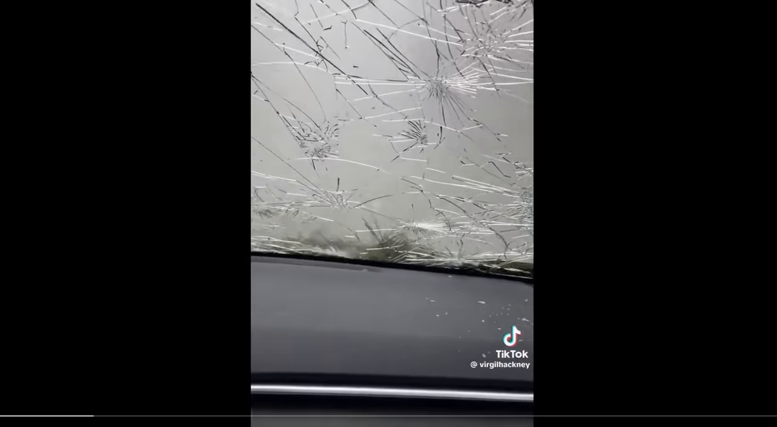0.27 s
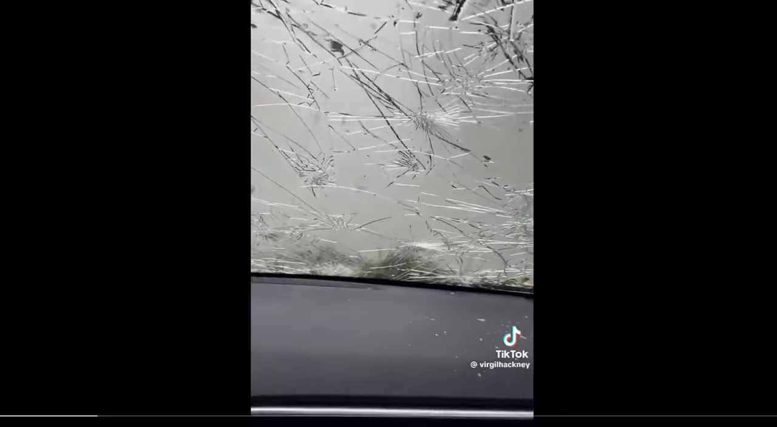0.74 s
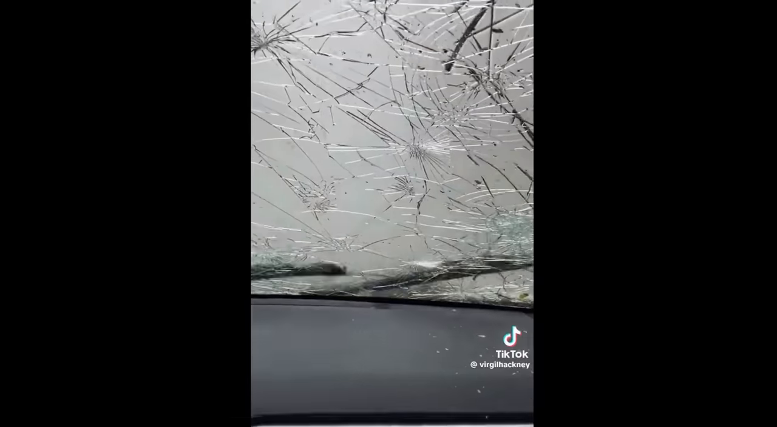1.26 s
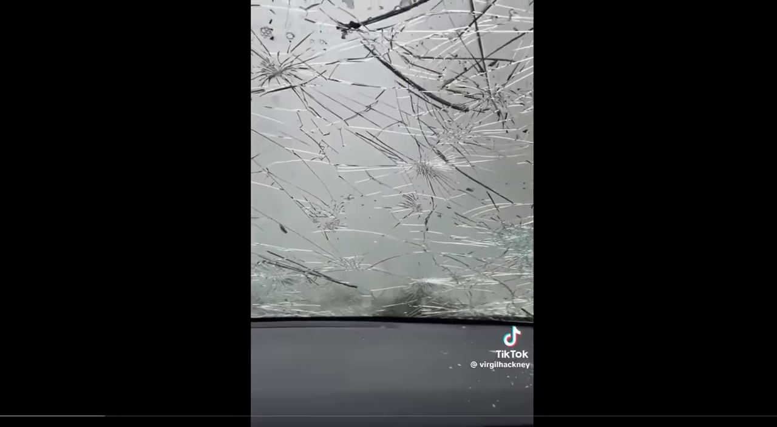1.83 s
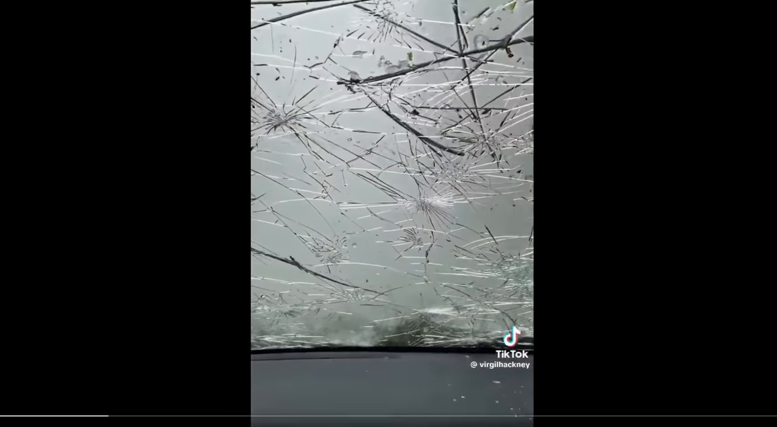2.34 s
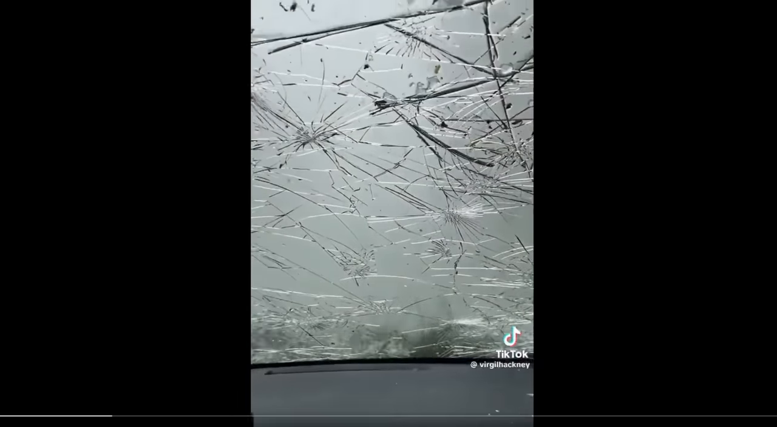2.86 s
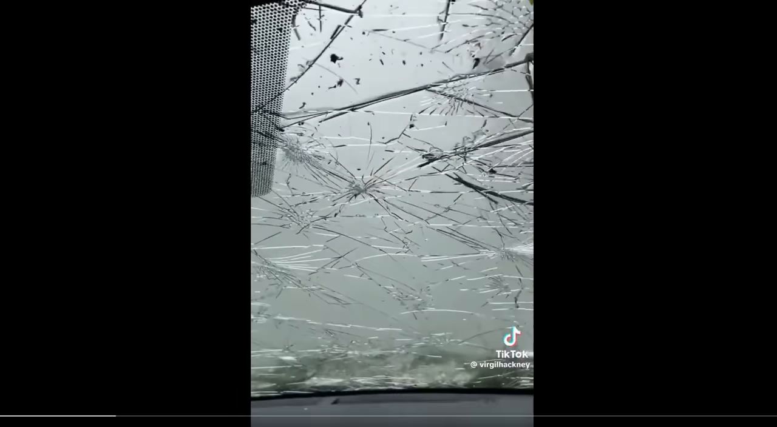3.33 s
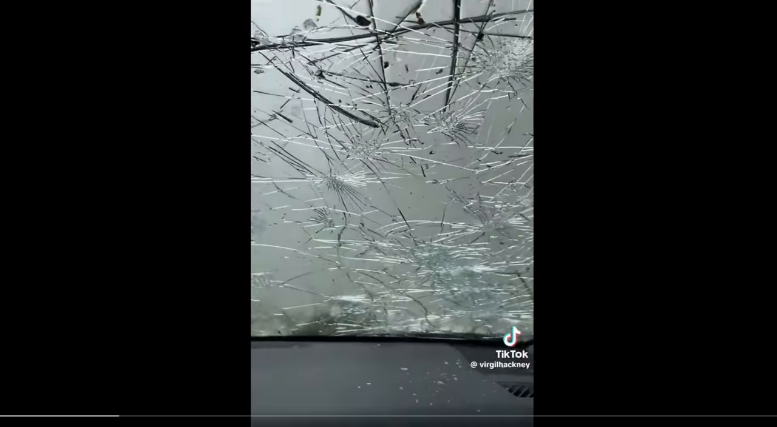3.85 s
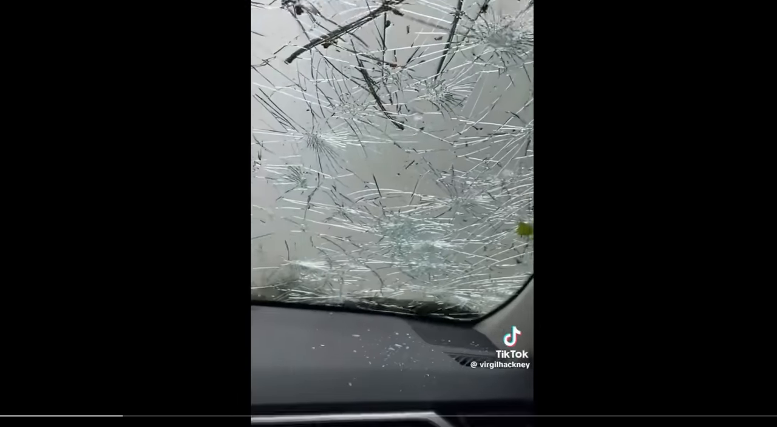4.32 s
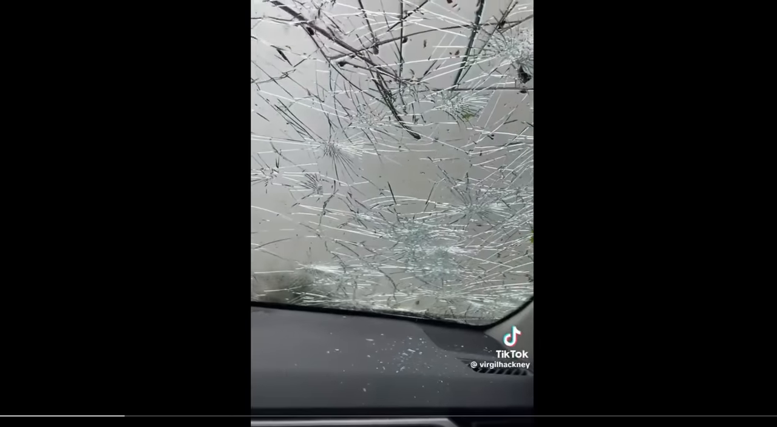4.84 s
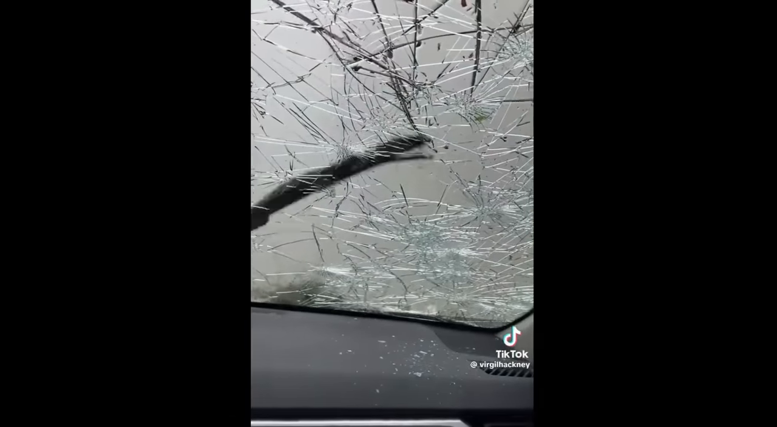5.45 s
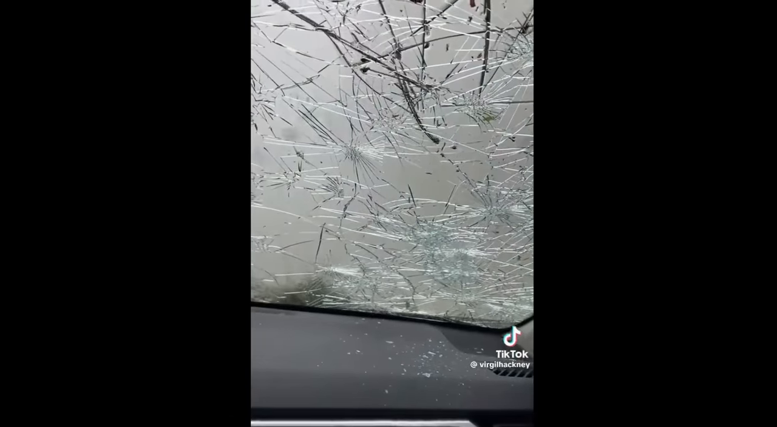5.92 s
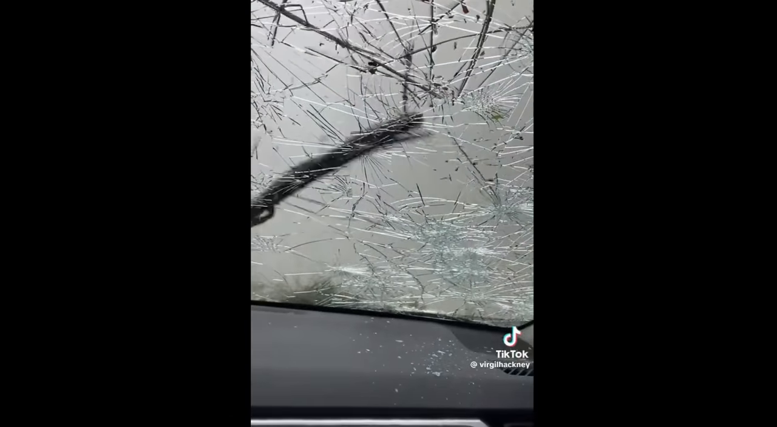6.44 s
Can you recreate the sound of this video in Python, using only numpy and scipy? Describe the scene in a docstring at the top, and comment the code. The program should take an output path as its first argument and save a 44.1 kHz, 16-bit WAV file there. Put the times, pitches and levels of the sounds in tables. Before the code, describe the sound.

Inside a closed car in a hailstorm, big stones strike roof and windscreen about twenty times a second, unevenly. Loud hollow knocks with sharp cracks mix with dull thuds and light ticks. Each blow dies quickly with a short boxy panel ring. Rain and tiny pellets patter quietly underneath. A close stereo microphone in the cabin catches centred bass and wider, scattered treble.

```python
"""Hail on a car, from inside

Hailstones pelt the roof and windscreen, from loud knocks to faint ticks; a two-port microphone hears
them in the cabin. Each blow sends a bending wave through the panel: treble first, bass last, a falling
sweep; the scattered ring of panels and cabin follows, with a short note of the panel and of the clack.
Underneath, rain and small stones make a patchy noise wash, and small hard pellets tick."""
import sys
import numpy as np
from scipy import signal
from scipy.fft import rfft, irfft
from scipy.io import wavfile
from scipy.ndimage import uniform_filter1d, minimum_filter1d

SR = 44100
rng = np.random.default_rng(int(sys.argv[2]) if len(sys.argv) > 2 else 0)


def to_wav(s):
    """Save 16-bit WAV."""
    ch = np.atleast_2d(s).T  # columns
    pcm = np.round(np.clip(ch, -1, 1) * 32767)  # PCM
    wavfile.write(sys.argv[1], SR, pcm.astype(np.int16))


N = 295012
SIZE = 8192  # samples in one blow


def gain_of(db):
    """Decibels to gain."""
    return np.exp(np.asarray(db) * (np.log(10) / 20))


def evened(x):
    """Scales each row to rms 1."""
    return x / np.sqrt(np.mean(abs(x) ** 2, axis=-1, keepdims=True) + 1e-20)


def read(points, hz):
    """Reads a spectrum table on a log frequency axis."""
    f, value = np.transpose(points)
    return np.interp(np.log(hz + 1), np.log(f + 1), value)


def hump(offset, width):
    """A resonance curve: 1 at its centre, half as much half a width away."""
    return 1 / (1 + (2 * offset / width) ** 2)


def add(mix, s, sound):
    """Adds a sound at time s."""
    part = mix[:, round(s * SR):][:, :sound.shape[1]]
    part += sound[:, :part.shape[1]]


def causal(gain):
    """The spectrum of least delay with this magnitude, so that nothing sounds before the blow."""
    folded = irfft(np.log(gain + 1e-5 * gain.max()), SIZE)
    folded[1:SIZE // 2] *= 2
    folded[SIZE // 2 + 1:] = 0
    return np.exp(rfft(folded))


# resonances of cabin air, roof and glass: [f/Hz, width/Hz, level/dB]
CABIN_RESONANCES = [(53.6, 26.3, 12), (79.7, 17, 7), (120.5, 28, 7), (157, 81, 6), (276.6, 36, 3.5),
                    (779, 19, 5.5), (961, 260, 5), (2320, 84, 2), (5270, 210, -3)]


def cabin_db(hz):
    """Resonances of air, roof and glass raise or lower the spectrum around their frequencies."""
    return sum(db * hump(hz - f, width) for f, width, db in CABIN_RESONANCES)


# relative colour of panels, cabin and microphone: [f/Hz, level per Hz/dB]
BODY_COLOUR = [(18, -58.5), (30, -23), (118, -4.5), (206, -9), (409, -4), (562, -12), (953, -20),
               (1240, -19), (5300, -16.5), (7280, -33), (8760, -30.5), (11100, -37), (13400, -39.5),
               (15200, -46), (16500, -75)]


def body_gain(hz):
    """Panels, cabin and microphone colour every hard impact."""
    return gain_of(read(BODY_COLOUR, hz) + cabin_db(hz))


# relative loudness of rain and small stones: [t/s, level/dB]
PATTER_LEVEL = [(0.0, -41), (0.759, -35.5), (0.89, -44.5), (1.64, -41.5), (1.77, -46.5), (2.529, -39.5),
                (3.07, -45), (3.35, -40.5), (4.34, -47), (4.82, -43), (5.2, -45.5), (5.48, -41.5),
                (5.91, -43.5), (6.06, -38), (6.35, -39.5), (6.69, -42)]
# relative colour of their wash in the cabin: [f/Hz, level per Hz/dB]
WASH_COLOUR = [(18, -41), (30, -1), (55, 0.5), (100, -5.5), (212, -3), (420, -3.5), (676, -9), (1800, -12),
               (2400, -12), (3200, -23), (5440, -25.5), (7090, -31.5), (10300, -29), (12300, -37),
               (13700, -33), (16500, -79)]


def patter(per_s=120, size_db=4, patchy_db=3.0, ticks_db=-2, tick_t60=0.03):
    """A patchy wash of rain whose level jumps with every small stone and dies away."""
    window, hop = 512, 128
    frames, hz = N // hop + 5, np.fft.rfftfreq(window, 1 / SR)
    real, imaginary, patches = rng.standard_normal((3, 2, window // 2 + 1, frames))
    patches = uniform_filter1d(uniform_filter1d(patches[0], size=8, axis=0), size=20, axis=1)

    sizes = gain_of(size_db * np.minimum(rng.exponential(1, frames), 4))
    stones = sizes * (rng.random(frames) < per_s * hop / SR)
    jumps = signal.lfilter([1], [1, -gain_of(-60 * hop / SR / tick_t60)], stones)
    light = (hz / (hz + 400))[:, None]  # small stones barely move the bass

    s, level_db = np.transpose(PATTER_LEVEL)
    level = gain_of(np.interp(np.arange(frames) * hop / SR, s, level_db))
    level = level * (1 + gain_of(ticks_db) * light * evened(jumps))
    grains = (real + 1j * imaginary) * gain_of(patchy_db * patches / patches.std()) * level
    wash = signal.istft(grains, nperseg=window, noverlap=window - hop)[1]

    hz = np.fft.rfftfreq(N, 1 / SR)
    colour = evened(gain_of(read(WASH_COLOUR, hz) + cabin_db(hz)))
    return irfft(rfft(wash[:, :N]) * colour, N) * gain_of(-23.0)


def pellets(per_s=70, size_db=4, level_db=-2, t60=0.08, low_hz=500, spots=6):
    """Small hard pellets tick on glass and roof, each on one of a few spots, louder with the patter."""
    hz, t, out = np.fft.rfftfreq(SIZE, 1 / SR), np.arange(2048) / SR, np.zeros((2, N))
    s, patter_db = np.transpose(PATTER_LEVEL)
    loudness_db = np.interp(np.arange(N) / SR, s, patter_db) + level_db
    size = gain_of(size_db * np.minimum(rng.exponential(1, N), 4) + loudness_db)
    size, spot = size * (rng.random(N) < per_s / SR), rng.integers(0, spots, N)
    bass_cut = hz ** 2 / (hz ** 2 + low_hz ** 2)
    body = irfft(causal(body_gain(hz) * bass_cut), SIZE)[None, :len(t)]
    for k in range(spots):
        # the direct tick is in the shared field only; echoes are in both
        direct = (t == 0) * np.array([[1], [0]])
        echoes = rng.standard_normal((2, len(t))) * gain_of(-24.5 - 60 * t / t60)
        tick = signal.fftconvolve(echoes + direct, body, axes=1)[:, :len(t)]
        hits = (size * (spot == k))[None]
        out += signal.oaconvolve(hits, tick / abs(tick).max(), axes=1)[:, :N]
    return out


# the parts of a blow, bass to treble:
# [centre f/Hz, relative level/dB, t60/s of the quick ring before smear scales it,
#  share of clean sweep (0-1) before smear blurs it]
BLOW_PARTS = [(113, 2, 0.053, 0.91), (308, 1, 0.054, 0.84), (1380, -4, 0.037, 0.24),
              (4630, 2.5, 0.028, 0.55), (11200, 6, 0.024, 0.05)]


def part_filters(hz):
    """Overlapping bands, one a part, coloured by the body, each of unit power."""
    centres = np.log([p[0] for p in BLOW_PARTS])
    shares = np.array([np.interp(np.log(hz + 1), centres, row) for row in np.eye(len(BLOW_PARTS))])
    return evened(shares ** 1.01 * body_gain(hz))


def struck_spot(hz, filters, note_hz, clack_hz, lumps_db=1.8, note_db=6, note_width=70):
    """Each spot favours other modes of the panel: random lumps, and humps on its own note and clack."""
    scale = np.log(hz + 50)
    waves = zip((7, 11, 17, 26, 40), rng.random(5))
    lumps = sum(np.cos(k * scale + 2 * np.pi * u) for k, u in waves)
    clack_hump = 6 * hump(hz / clack_hz - 1, .5)  # dB; its width is a share of the pitch
    note_hump = note_db * hump(hz - note_hz, note_width)
    return evened(filters * gain_of(lumps_db * lumps / 2 + clack_hump + note_hump))


def contact_smear(crack_db, slush):
    """Contact time in s: the fainter the crack, the longer the contact smears."""
    hard_db, hard_ms, softer_ms_per_db = -20.5, 1.8, 0.8639
    return max(slush * (hard_ms + softer_ms_per_db * (hard_db - crack_db)), .4) / 1000


# one row a distinct blow, from loud knock to faint tick, levels relative:
# [t/s, clack level/dB, boom level/dB, knock level/dB, crack level/dB, note of the panel f/Hz,
#  pitch of the clack f/Hz, slush: how many times longer than usual the contact smears]
SINGLE_BLOWS = [(0.002, -25.5, -43, -36, -39, 282, 2050, 1.26),
                (0.091, -14, -17, -11.5, -29, 410, 2030, 0.86),
                (0.142, -24, -52, -26.5, -46.5, 395, 870, 0.55),
                (0.184, -11, -32, -25.5, -24, 306, 1740, 1.03),
                (0.231, -25.5, -45, -38, -44.5, 350, 1930, 0.63),
                (0.246, -18, -25, -22, -40.5, 282, 950, 1.75),
                (0.281, -27, -21.5, -33, -45.5, 274, 1240, 0.89),
                (0.305, -24.5, -29, -33, -50.5, 280, 690, 0.99),
                (0.373, -11, -20, -20.5, -27, 432, 2060, 0.51), (0.422, -25.5, -45, -33, -32, 404, 2900, 1),
                (0.448, -28, -22.5, -29.5, -42, 346, 660, 1.2),
                (0.529, -17.5, -19.5, -18.5, -39, 389, 3200, 1.09),
                (0.576, -31, -48, -29, -50.5, 395, 700, 0.5),
                (0.626, -12, -29.5, -16.5, -30.5, 424, 614, 0.85),
                (0.66, -24, -42, -17.5, -55, 384, 664, 0.35),
                (0.715, -13.5, -20, -26, -25.5, 410, 1390, 2.63),
                (0.76, -18, -25, -22, -44.5, 328, 880, 0.95),
                (0.795, -21, -17.5, -20.5, -38, 365, 1450, 2.2), (0.823, -10, -33, -18, -23, 452, 970, 1),
                (0.84, -10.5, -28, -41, -20, 345, 1100, 3.6), (0.857, -22, -27, -33, -28, 232, 3120, 0.84),
                (0.877, -18.5, -21, -26, -28.0, 407, 780, 1.65),
                (0.956, -33, -49, -54, -44.5, 354, 2270, 0.26),
                (1.05, -11, -18.5, -15.5, -20, 408, 770, 0.98),
                (1.097, -32, -43, -27, -46.5, 415, 790, 0.7), (1.119, -25, -27, -47, -33, 480, 676, 1.14),
                (1.142, -13, -18, -8.5, -28.5, 453, 1880, 0.8),
                (1.168, -21, -28, -33, -33.5, 366, 730, 0.33),
                (1.189, -13, -21, -22.5, -24, 392, 1060, 0.92),
                (1.236, -24, -23.5, -24, -43, 350, 990, 0.78),
                (1.253, -15, -15.5, -21.5, -23.5, 428, 910, 1.38),
                (1.299, -29.5, -39, -30, -43, 410, 945, 0.55), (1.346, -45, -39, -51, -40, 350, 1850, 0.14),
                (1.425, -22.5, -25, -46, -33.5, 235, 950, 1.36),
                (1.453, -27, -22.5, -25.5, -42, 236, 1140, 0.98),
                (1.475, -27, -18, -52, -49, 377, 760, 1.07),
                (1.502, -9.5, -20.5, -17.5, -20.5, 334, 790, 2.6),
                (1.549, -24.5, -24, -30, -48, 369, 830, 1.3),
                (1.592, -11, -19.5, -19, -22.5, 388, 1680, 1.47),
                (1.643, -29, -40, -26, -41.5, 352, 680, 0.62),
                (1.655, -19, -33, -31, -32.5, 510, 970, 1.37), (1.666, -19, -26, -24.5, -33, 400, 980, 1.2),
                (1.713, -30, -51, -33, -55, 380, 680, 0.63), (1.785, -45, -56, -45, -48.5, 352, 2500, 0.38),
                (1.897, -40, -54, -46, -56, 347, 1200, 0.37), (1.94, -44, -54, -42, -53, 350, 2800, 0.4),
                (1.96, -19.5, -24, -26.5, -36, 466, 1770, 1.99),
                (2.007, -27.5, -28, -33, -45.5, 470, 1910, 0.77),
                (2.136, -27, -39, -29.5, -35.5, 460, 2620, 0.86),
                (2.209, -15.5, -28, -18.5, -40, 352, 1140, 0.71),
                (2.226, -38, -18.5, -28, -45, 222, 790, 0.73),
                (2.269, -22, -40, -26.5, -44, 390, 1800, 0.72),
                (2.349, -30, -33, -26.5, -48, 280, 1070, 0.95),
                (2.376, -28, -32, -27, -32, 228, 3200, 2.73),
                (2.416, -31, -31.5, -26.5, -41.5, 247, 920, 2), (2.542, -36, -30, -36, -40, 240, 980, 0.71),
                (2.609, -8.5, -26.5, -22, -36.5, 410, 1890, 0.17),
                (2.636, -32, -46, -30.5, -44, 300, 1070, 0.95),
                (2.657, -15.5, -21, -26, -47, 305, 1860, 0.84),
                (2.722, -27, -31, -36, -48, 441, 1860, 0.73),
                (2.774, -16.5, -25.5, -15, -24, 417, 2550, 0.85),
                (2.82, -32.5, -47, -27.5, -42, 433, 2510, 0.53),
                (2.939, -18.5, -32, -25, -37.5, 314, 1930, 1.21),
                (3.005, -29.5, -55, -41, -50.0, 273, 2240, 0.75),
                (3.131, -25, -35, -31, -46.5, 480, 1290, 1.1),
                (3.164, -20.5, -30, -12.5, -42.5, 381, 600, 0.46),
                (3.2, -30.5, -33, -24, -48.5, 373, 655, 0.3), (3.214, -35, -49, -20, -56, 385, 660, 0.22),
                (3.257, -20.5, -36, -19.5, -38, 340, 770, 0.82),
                (3.349, -15.5, -36, -21.5, -40, 330, 690, 0.63),
                (3.4, -26.5, -38, -23, -37, 268, 890, 1.43),
                (3.433, -21.5, -32, -26, -41.5, 313, 870, 0.64),
                (3.461, -35, -40, -29, -35, 390, 1630, 1.8),
                (3.592, -12.5, -18.5, -23.5, -29, 380, 750, 0.32),
                (3.641, -30, -39, -25.5, -45, 354, 3100, 0.21),
                (3.655, -12.5, -17.5, -23, -21.5, 229, 1080, 1),
                (3.671, -22, -21, -23.5, -44, 234, 846, 1.14),
                (3.699, -20.5, -30, -23.5, -35, 288, 1440, 0.9),
                (3.728, -8.5, -18, -17.5, -19.5, 230, 1000, 0.51),
                (3.749, -20, -29, -20.5, -41.5, 384, 1130, 1.05),
                (3.773, -47, -27, -29, -48, 272, 960, 0.92), (3.911, -38.5, -39, -38, -38, 265, 3260, 3.6),
                (4.004, -13, -25.5, -14.5, -25.5, 336, 1370, 0.47),
                (4.038, -20, -33, -18.5, -40.5, 230, 960, 0.86),
                (4.062, -13.5, -19.5, -26, -27.5, 500, 950, 1.04),
                (4.111, -28.5, -49, -31, -42, 520, 2330, 0.36),
                (4.381, -38, -44, -43, -48, 402, 1200, 0.66), (4.438, -19, -38, -23.5, -37, 450, 870, 0.98),
                (4.472, -11.5, -21.5, -17.5, -23.5, 333, 776, 1.3),
                (4.503, -27.5, -48, -34.5, -40.5, 227, 2160, 1), (4.523, -35, -36, -28, -51, 470, 740, 0.3),
                (4.64, -14.5, -23, -19, -29, 206, 1060, 0.23),
                (4.684, -27.5, -31, -29.5, -47, 345, 770, 0.83),
                (4.733, -30.5, -35, -42, -41, 350, 990, 0.88), (4.769, -60, -34, -33, -54, 360, 960, 0.49),
                (4.802, -32.5, -28, -34, -45, 312, 2700, 0.94),
                (4.881, -16.5, -21.5, -22.5, -34, 319, 1570, 1.26),
                (4.92, -22.5, -22.5, -36, -44, 330, 1950, 0.9),
                (4.938, -31, -25, -29.5, -51.5, 330, 810, 0.74),
                (5.03, -31.5, -37.0, -45, -52, 335, 1100, 0.32),
                (5.11, -26, -25, -46, -29, 310, 1070, 1.63), (5.189, -47, -40, -38.5, -49, 330, 2100, 0.14),
                (5.292, -25.5, -32, -37, -50.5, 396, 1250, 0.66),
                (5.36, -23, -33, -33.5, -39, 433, 1770, 1.08), (5.411, -29, -23.5, -30, -53.5, 238, 685, 1),
                (5.508, -16, -20, -15.5, -26, 410, 704, 0.59),
                (5.523, -21, -31, -29.5, -23.5, 238, 2510, 0.71),
                (5.558, -31, -42, -26, -50, 430, 2380, 0.23), (5.573, -37, -50, -46, -46, 350, 2390, 0.4),
                (5.593, -24, -59, -43, -49, 336, 770, 0.31),
                (5.657, -12, -21.5, -23.5, -22.0, 299, 996, 2.3),
                (5.703, -27, -27, -37, -44, 342, 2550, 0.62),
                (5.791, -56, -57, -57, -42.5, 350, 3200, 0.45),
                (5.853, -29.5, -30, -25, -48, 315, 660, 1.36),
                (5.876, -17, -27, -22.5, -36.5, 466, 1360, 1.25),
                (5.896, -18, -39, -23.5, -38.5, 312, 1040, 1.06),
                (5.922, -13, -22, -21.5, -25.5, 407, 715, 0.96),
                (5.95, -32.5, -41, -42, -33.5, 310, 930, 0.65),
                (5.97, -29, -37, -32.5, -46.5, 394, 650, 1.72),
                (6.061, -23.5, -34.5, -26.5, -36, 393, 950, 0.068),
                (6.127, -17, -25, -15.5, -31, 361, 820, 0.49),
                (6.143, -22.5, -37, -25, -33.5, 300, 660, 0.18),
                (6.162, -12, -25.5, -26.5, -22, 350, 754, 0.9),
                (6.21, -34, -38, -30, -44.5, 387, 1970, 0.81),
                (6.326, -18.5, -17, -21, -32.5, 300, 1030, 2),
                (6.384, -16, -19, -25.5, -33.5, 282, 1880, 0.95),
                (6.504, -32, -31, -35, -38, 260, 1800, 0.71),
                (6.526, -18.5, -17, -22.5, -37, 320, 1110, 1.8),
                (6.623, -18.5, -17, -26, -42.5, 290, 1900, 1.22)]


def hail(sweep_s=.013, slope=.8, spread=0.1469, long_db=-25, long_t60=0.4, modes_db=3.5,
         soft_lead=.15, aside=.5):
    """Bending waves sweep down and panels ring: one field both ports share, one that sets them apart."""
    hz, t, out = np.fft.rfftfreq(SIZE, 1 / SR), np.arange(SIZE) / SR, np.zeros((2, N))
    centre, part_db, t60, sweep = np.transpose(BLOW_PARTS)[:, :, None]
    filters = part_filters(hz)
    for s, clack_db, boom_db, knock_db, crack_db, note_hz, clack_hz, slush in SINGLE_BLOWS:
        noise = rng.standard_normal((2, 1, SIZE))
        spot = struck_spot(hz, filters, note_hz, clack_hz)
        smear = contact_smear(crack_db, slush)
        top_db = crack_db - 8 - 3.0 * np.log(slush)  # slush dulls the topmost part
        gain = gain_of(np.array([[boom_db], [knock_db], [clack_db], [crack_db], [top_db]]) + part_db)

        # bending waves are slow in the bass: the delay, given at 100 Hz, falls as a power of frequency
        delay_s = sweep_s * np.exp(spread * rng.standard_normal())
        late = delay_s * (100 / centre) ** slope
        wave = np.exp(-2j * np.pi * delay_s * 100 ** slope * hz ** (1 - slope) / (1 - slope))
        clean = sweep * np.exp(-(smear / (0.0082 + 1.6 * late)) ** 2)  # smear blurs the treble first
        lasting = np.sqrt(SR * (late + 0.0043))  # a band that sweeps for longer holds more energy
        direct = irfft(wave * causal((spot * gain * clean * lasting).sum(0)), SIZE) * (t < .1)

        rise = 1 - np.exp(-(t / (.5 * late + 0.3 * smear)) ** 2)
        quick = gain_of(-60 * t / (t60 * (0.76 + smear / 0.0069)))
        middle = gain_of(-14.0 - 60 * t / 0.049)
        shape = rise * (quick + middle + gain_of(long_db - 60 * t / long_t60))
        # the tail flickers unevenly at random, each upper part on its own
        steps = np.arange(48) * .004
        flicker = np.array([np.interp(t, steps, u) for u in rng.standard_normal((3, 48))])
        flicker = np.vstack([np.zeros((2, SIZE)), flicker * np.minimum(t / .012, 1)])
        shape = shape * gain_of(2.5 * flicker)
        # random narrow peaks and dips make the ring more tonal
        peaks = evened(uniform_filter1d(rng.standard_normal(len(hz)), size=13)) * hz / (hz + 500)
        scattered = irfft(rfft(noise) * spot * gain_of(modes_db * peaks), SIZE)
        ring = evened(scattered * shape) * gain * np.sqrt(np.mean(shape ** 2, axis=1, keepdims=True))

        # every blow leaves the panel's note, stronger in dull ones
        note = gain_of(knock_db + 9 - 60 * t / 0.045) * rise[1] * np.sin(2 * np.pi * note_hz * t)
        note = note * (1 - clean[1] / 2)
        # and a short solid tone at the clack's pitch
        clack = gain_of(clack_db - 1 - 60 * t / 0.029) * rise[2] * np.sin(2 * np.pi * clack_hz * t)
        solid = direct + note + clack
        shared = solid + (ring[0] * np.sqrt(1 - clean ** 2)).sum(0)
        unshared = ring[1].sum(0) + aside * rng.standard_normal() * solid  # blows scatter left and right
        start = max(s - soft_lead * smear, 0)  # a smeared blow starts a little early
        add(out, start, np.array([shared, unshared]))
    return out


# phase by which the left port leads: [f/Hz, lead/rad]
PORT_LEAD = [(0, 0), (600, 0), (1210, -.2), (3010, 1.1), (5510, .4), (6800, 3), (8100, 3.3), (9390, 6.2),
             (11600, 6.4), (12500, 9.3), (14700, 9.5), (15500, 12.6)]
# left port over right: [f/Hz, level/dB]
LEFT_OVER_RIGHT = [(200, 0), (400, .7), (1000, 1.1), (2400, 0)]
# mixing weight of the unshared over the shared field: [f/Hz, level/dB]
UNSHARED_OVER_SHARED = [(30, -31), (70, -41), (150, -29), (250, -24), (400, -17), (650, -7), (1000, -7),
                        (2000, -2), (4000, -6), (8000, -8), (15000, -10)]


def scene():
    """The two ports nearly share the bass; the treble differs in phase and detail."""
    first, second = rfft(patter() + pellets() + hail())
    hz = np.fft.rfftfreq(N, 1 / SR)
    ratio = gain_of(read(UNSHARED_OVER_SHARED, hz))
    turn = np.exp(.5j * np.interp(hz, *np.transpose(PORT_LEAD)))
    louder = gain_of(read(LEFT_OVER_RIGHT, hz) / 2)  # half to each port
    alike = first / np.sqrt(1 + ratio ** 2)
    apart = second * ratio / np.sqrt(1 + ratio ** 2)
    left = (alike + apart) * turn * louder
    right = (alike - apart) / turn / louder
    return irfft(np.array([left, right]), N)


def record(dry, ceiling_db=-5.5, edge_hz=16800):
    """A quick limiter holds the peaks of both ports down; then a low-pass limits the band."""
    peak = -minimum_filter1d(-abs(dry).max(0), size=301)  # the highest level close by
    held = dry * uniform_filter1d(np.minimum(1, gain_of(ceiling_db) / (peak + 1e-9)), size=151)
    low_pass = signal.firwin(511, edge_hz, window=("kaiser", 9), fs=SR)
    return signal.oaconvolve(held, low_pass[None], "same")


dry = scene()
out = record(dry)
to_wav(out)
```